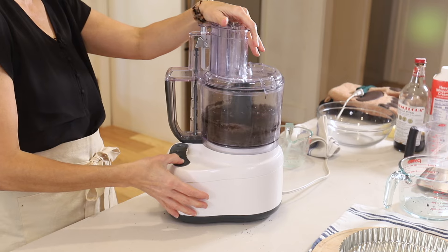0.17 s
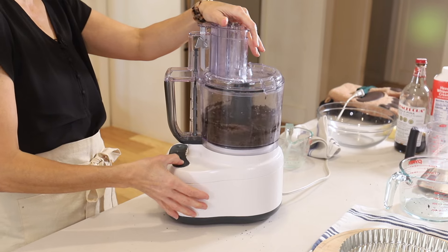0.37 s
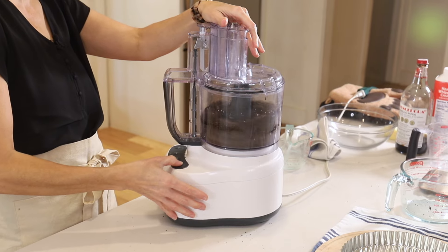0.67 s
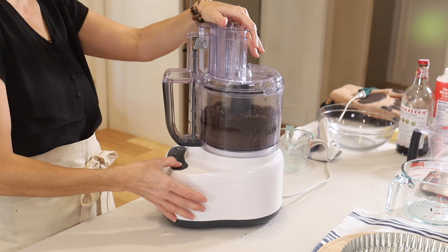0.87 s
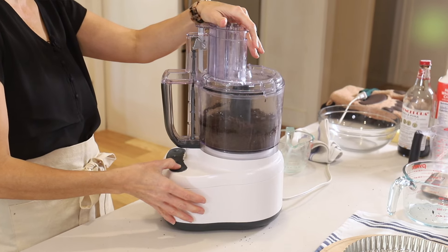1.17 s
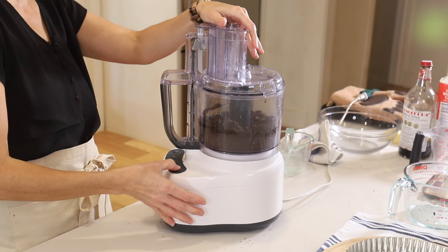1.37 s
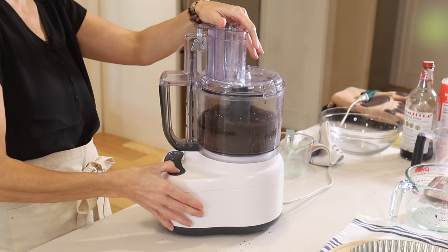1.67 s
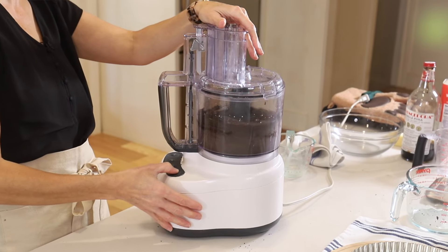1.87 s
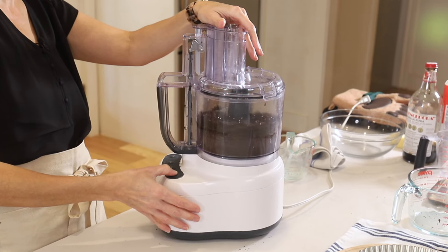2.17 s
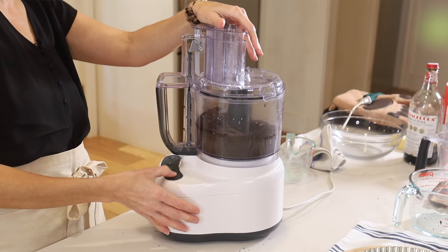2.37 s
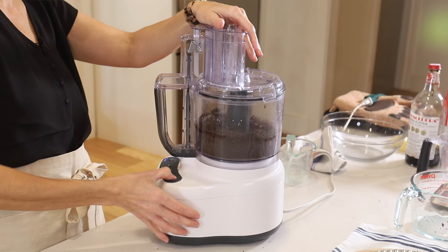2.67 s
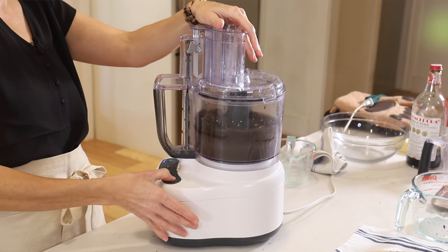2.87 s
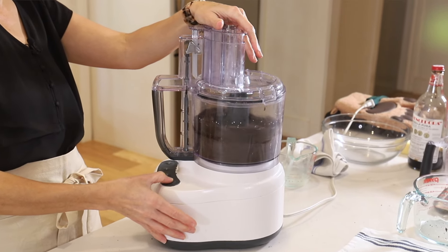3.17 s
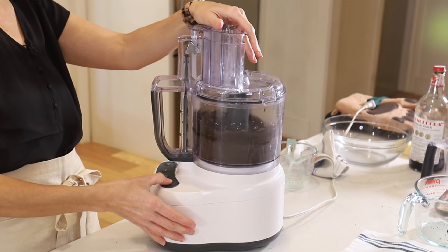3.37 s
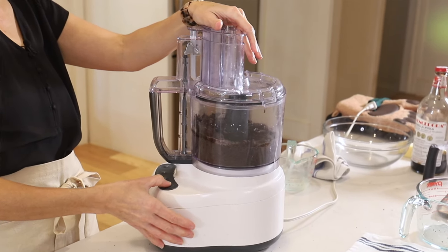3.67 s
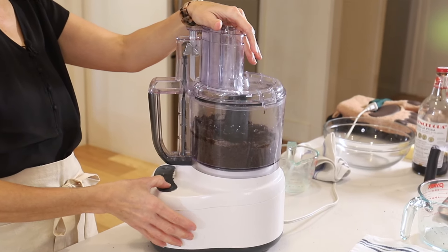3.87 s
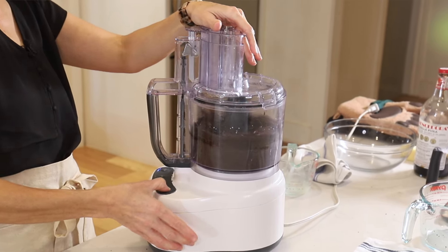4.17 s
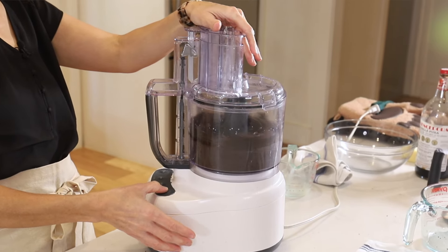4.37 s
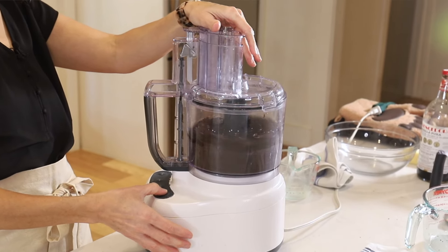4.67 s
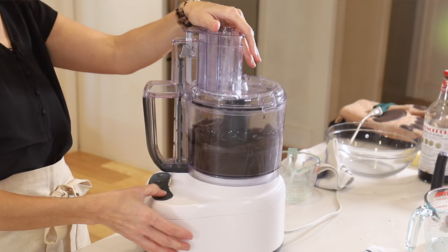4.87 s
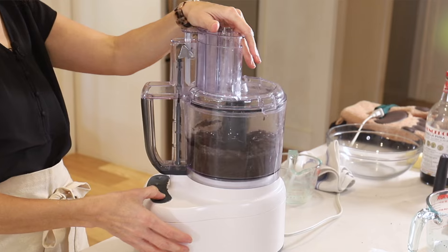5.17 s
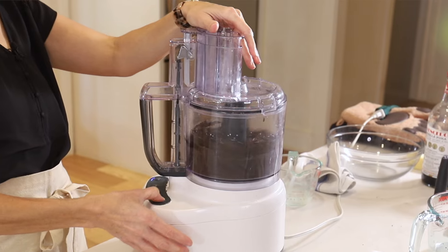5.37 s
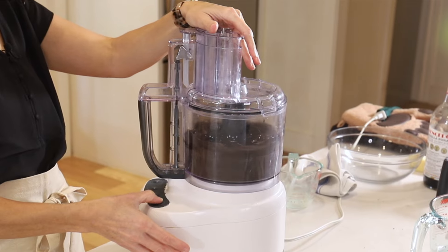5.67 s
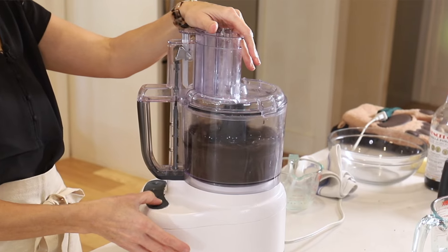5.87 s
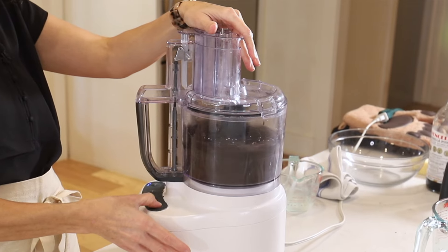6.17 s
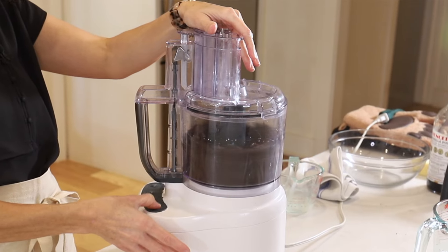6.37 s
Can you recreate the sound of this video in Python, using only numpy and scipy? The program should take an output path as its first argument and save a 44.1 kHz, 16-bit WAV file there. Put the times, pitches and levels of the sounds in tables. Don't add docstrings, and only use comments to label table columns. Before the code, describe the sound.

A food processor is pulsed in short bursts, its geared motor whining up and sagging down while the blade grinds dry crumbs in a kitchen.

```python
import sys
import numpy as np
from scipy import signal
from scipy.fft import rfft, irfft, next_fast_len
from scipy.io import wavfile
from scipy.ndimage import uniform_filter1d

SR = 44100
rng = np.random.default_rng(int(sys.argv[2]) if len(sys.argv) > 2 else 0)


def to_linear_factor(level_db):
    exponent = np.asarray(level_db, float) / 20
    return 10 ** exponent


def transcribe(signal):
    frames = np.atleast_2d(signal).T
    limited = np.clip(frames, -1, 1)
    pcm = np.round(limited * 32767).astype(np.int16)
    wavfile.write(sys.argv[1], SR, pcm)


N = 288017

# (power on [s], power off [s], drag of the heap [x],
# bite as the blade catches [dB], how early the noise dies [x])
PRESSES = [
    (-.5, -0.28, 1.17, -60, 0.87),
    (0.449, 0.641, 1, -21, 1.18),
    (1.572, 1.821, 1.03, -21.5, 0.96),
    (2.6909, 2.945, 1.02, -19, 1.03),
    (4.014, 4.29, 1.02, -26, 0.84),
    (5.341, 5.584, 1.018, -23.5, 1.05),
    (6.032, 6.229, 0.99, -24, 1.5),
    (6.407, 6.899, 1.002, -39, 1.06),
]
# (time [s], peak level [dB])
SWITCH_SNAPS = [(.434, -45.5), (.444, -39), (1.559, -45), (1.568, -37.5), (2.676, -43), (2.684, -37.5),
                (3.988, -49.5), (4.0, -46), (4.008, -33.5), (5.326, -43), (5.341, -39)]
# (time [s], peak level [dB])
BASE_KICKS = [
    (0.457, -39),
    (1.572, -44.5),
    (2.694, -41),
    (4.022, -41.5),
    (5.351, -43),
    (6.03, -50),
]
TORQUE_FADE_HZ = 1310
IDLER_TEETH = 45


def rms_one(x):
    return x / np.sqrt(np.mean(x ** 2) + 1e-20)


def at_hz(points, hz):
    points = np.array(points)
    return np.interp(np.log(hz + 1), np.log(points[:, 0]), points[:, 1])


def bumps(modes, hz):
    return sum(db / (1 + ((hz - centre) / width * 2) ** 2) for centre, width, db in modes)


def drift(rate_hz):
    r = np.exp(-2 * np.pi * rate_hz / SR)
    slow = signal.lfilter([1], [1, -2 * r, r * r], rng.standard_normal(N + SR))
    return rms_one(slow[SR:])


def colour(x, gain_db):
    size = next_fast_len(N + SR // 2, real=True) // 2 * 2
    hz = np.arange(size // 2 + 1) * SR / size
    cepstrum = irfft(gain_db(hz) * np.log(10) / 20, size)
    cepstrum[1:size // 2] *= 2
    cepstrum[size // 2 + 1:] = 0
    return irfft(rfft(x, size) * np.exp(rfft(cepstrum)), size)[..., :N]


def band(x, low_hz, high_hz):
    sos = signal.butter(4, [low_hz, high_hz], "band", fs=SR, output="sos")
    return rms_one(signal.sosfilt(sos, x))


def ring(clicks, hz, t60):
    r, w = to_linear_factor(-60 / (t60 * SR)), 2 * np.pi * hz / SR
    return signal.lfilter([0, np.sin(w)], [1, -2 * r * np.cos(w), r * r], clicks + 1e-18)


def fade(x, t60):
    return signal.lfilter([1], [1, -to_linear_factor(-60 / (t60 * SR))], x)


def strikes(table):
    clicks = np.zeros(N)
    clicks[[round(s * SR) for s, db in table]] = to_linear_factor(np.array(table)[:, 1])
    return clicks


def swell(rows, lag_s, width_s):
    now, out = np.arange(N) / SR, np.zeros(N)
    for s, db in rows:
        near = slice(int(s * SR) - 2000, int(s * SR) + 4000)
        out[near] += to_linear_factor(db) * np.exp(-.5 * ((now[near] - s - lag_s) / width_s) ** 2)
    return out


def housing_db(hz):
    # (frequency [Hz], level [dB])
    broad = [(40, -48), (96, -34), (184, -25.5), (311, -19), (512, -10.5), (1140, -12), (1500, 0),
             (1830, -5.5), (2470, -9), (3020, -6.5), (6560, -23.5), (8800, -30), (10000, -32),
             (15700, -38.5)]
    # (frequency [Hz], width [Hz], level above the broad colour [dB])
    panels = [(176.6, 56, 7.5), (386, 140, 2), (529.3, 68, 7), (674.6, 24, 6.5), (850, 22, 7),
              (976, 68, 5.5), (1230, 36, -1.5), (1420, 64, 0), (1547, 39, 3.5), (1720, 38, 5.5),
              (1953, 42, 7.5), (2178, 184, 14), (2470, 95, 3), (2516, 18, 1.5), (2724, 46, 7),
              (3012, 136, 4.5), (3936, 37, 5), (4550, 370, 1.5), (5330, 170, 1.5), (6200, 150, 4.5),
              (8500, 300, 1.5), (6960, 170, 6), (7880, 170, 5.5)]
    return at_hz(broad, hz) + bumps(panels, hz)


def room_tone():
    # (frequency [Hz], level [dB])
    spectrum = [(20, -31), (45, -32), (62, 5.5), (85, -4), (158, 6), (443, 2.5), (692, 4.5), (1080, -5),
                (1790, -3), (4740, -17.5), (15700, -26), (17000, -25)]
    noise = colour(rng.standard_normal(N), lambda hz: at_hz(spectrum, hz))
    return to_linear_factor(-44.5 - 14.0) * rms_one(noise)


def motor():
    start_hz, stall_hz_per_s = 954.4, 71790
    rub_hz_per_s, drag_hz_per_s, drag_power = 1028, 2278, .571
    release_s = .04
    on, off, drag = np.transpose(PRESSES)[:3, :, None]
    t = np.arange(N * 1000 // SR + 2) / 1000
    rise = np.clip((t - on) * 1000, 0, 1)
    fall = np.clip((off - t) / release_s + .5, 0, 1)
    power = np.sum(rise * fall, axis=0)
    heap = drag[np.searchsorted(on[:, 0], t) - 1, 0]
    speed = [float(start_hz)]
    for pull, load in zip(power * stall_hz_per_s, heap):
        hz = speed[-1]
        resistance = load * (rub_hz_per_s + drag_hz_per_s * (hz / 1000) ** drag_power)
        push = pull * np.exp(-hz / TORQUE_FADE_HZ) - resistance
        speed.append(max(hz + push / 1000, 1.))
    now = np.arange(N) / SR
    press = np.searchsorted(on[:, 0], now) - 1
    return np.interp(now, t, speed[:-1]), np.interp(now, t, power), press


def effort(mesh_hz, power, press, law, settle, creak_db):
    db, slope_db, knee_hz, steep, pull_db = law
    settle_db, settle_t60 = settle
    pull = power * np.exp(-mesh_hz / TORQUE_FADE_HZ)
    knee = knee_hz * np.array(PRESSES)[press, 4]
    running = to_linear_factor(db + slope_db * np.log2(mesh_hz / 2000) + pull_db * pull)
    running = running / np.sqrt(1 + (knee / mesh_hz) ** steep)
    trail = fade(running, settle_t60) * np.log(1000) / (settle_t60 * SR)
    return running + to_linear_factor(settle_db) * trail + to_linear_factor(creak_db) * fade(strikes(SWITCH_SNAPS), 0.12)


def grinding(mesh_hz, per_s, spread_db, runout_db, rattle_db, swish_db, surge_db):
    mesh_per_blade_turn = 135
    sizes = to_linear_factor(spread_db * np.minimum(rng.exponential(1, N), 3.5)) * rng.choice([-1, 1], N)
    crumbs = sizes * (rng.random(N) < per_s * to_linear_factor(3.0 * drift(30)) / SR)
    angle = 2 * np.pi * np.cumsum(mesh_hz) / SR
    blade = np.cos(angle / mesh_per_blade_turn) + 0.49 * np.cos(2 * angle / mesh_per_blade_turn)
    bearing = rng.standard_normal(N) * to_linear_factor(runout_db * np.cos(angle / IDLER_TEETH))
    bearing = bearing * to_linear_factor(rattle_db * np.cos(2 * angle / IDLER_TEETH))
    drive = rms_one(crumbs) * to_linear_factor(-3) + bearing
    drive = drive * to_linear_factor(swish_db * blade + surge_db * drift(25))
    return colour(drive, housing_db)


def fluttering(noise, flutter_db):
    edges_hz = (1150, 1600, 1870, 2080, 2400, 2850, 4000)
    steady = band(noise, edges_hz[0], edges_hz[-1])
    out = steady
    for pair in zip(edges_hz, edges_hz[1:]):
        part = signal.sosfilt(signal.butter(2, pair, "band", fs=SR, output="sos"), steady)
        out = out + (to_linear_factor(flutter_db * drift(17)) - 1) * part
    return rms_one(out)


def lid_at_rest(x, mesh_hz):
    lid_hz, width_hz, wakes_hz, share_lost_at_rest = 2180, 140, 300, .5
    ringing = signal.lfilter(*signal.iirpeak(lid_hz, lid_hz / width_hz, fs=SR), x)
    return x - share_lost_at_rest / (1 + (mesh_hz / wakes_hz) ** 2) * ringing


def gears(orders, mesh_hz, wobble_db, runout_db, slack):
    # (frequency [Hz], width [Hz], level [dB])
    mounts = [(193, 35, 10), (511, 80, 12.5), (667, 71, 8), (870, 490, 8), (1760, 97, 7.5),
              (3200, 910, 7.5), (5600, 1500, -2), (7730, 650, 16), (8602, 250, 9)]
    turns, speed = np.cumsum(mesh_hz) / SR, mesh_hz / 1500 + 0.31
    flicker = [speed * drift(rate) for rate in (50, 70, 90)]
    play = drift(70) + speed ** 2 * drift(150)
    tones = np.zeros(N)
    for i, (multiple, db, slope_db) in enumerate(orders):
        level = to_linear_factor(db + slope_db * np.log2(speed) + wobble_db * flicker[i % 3])
        tones += level * np.sin(2 * np.pi * multiple * (turns + slack * play) + i)
    tones = tones * to_linear_factor(runout_db * np.cos(2 * np.pi * turns / IDLER_TEETH))
    return rms_one(colour(tones, lambda hz: housing_db(hz) + bumps(mounts, hz)))


def tone_db(mesh_hz, power, press, column):
    # (mesh rate [Hz], whine [dB], tooth-knock overtones [dB])
    driven_levels = [(500, -35, -54), (970, -29.5, -41), (1610, -33.5, -30), (1970, -37.5, -45),
                     (2500, -44, -44), (2860, -38, -26)]
    # (mesh rate [Hz], whine [dB], tooth-knock overtones [dB])
    coasting_levels = [(60, -33, -41), (196, -44, -40), (390, -35, -33.5), (650, -32.5, -32),
                       (1010, -28.5, -35.5), (1410, -35.5, -54), (1900, -35.5, -49), (2610, -37, -32.5)]
    # (driven whine [dB], driven knock [dB], coasting whine [dB], coasting knock [dB])
    contact_levels = [
        (.1, .1, .8, .8),
        (1.5, -.5, 1.2, 1.5),
        (-2, .1, .3, -.5),
        (.3, .1, -.8, -.3),
        (-.8, .5, -1.2, -1.2),
        (3, -2.5, -2.5, -2.5),
        (3.5, -.5, -.5, .1),
        (1.2, .5, .1, .1),
    ]
    backlash_s = 0.024
    driven = uniform_filter1d(power, size=int(backlash_s * SR))
    contact = np.array(contact_levels)[press]
    on = at_hz(np.array(driven_levels)[:, [0, column]], mesh_hz) + contact[:, column - 1]
    off = at_hz(np.array(coasting_levels)[:, [0, column]], mesh_hz) + contact[:, column + 1]
    patchy = .8 * drift(9)
    return patchy + driven * on + (1 - driven) * off


def gear_whine(mesh_hz, power, press):
    # (multiple of mesh rate, level [dB], slope [dB per octave of speed])
    orders = [(.0909, 5.5, 0.4), (.1818, -10.5, -6), (.335, -8.5, 8), (1.0, 5, 2)]
    level = to_linear_factor(tone_db(mesh_hz, power, press, column=1))
    return level * gears(orders, mesh_hz, wobble_db=2.2, runout_db=3.5, slack=.04)


def tooth_knock(mesh_hz, power, press):
    # (multiple of mesh rate, level [dB], slope [dB per octave of speed])
    overtones = [(2.0, 5, -2), (3.0, 2.5, -1), (4.0, -3, -6), (5.0, -10.5, -12), (6.0, -20.5, -9),
                 (7.0, -1, -2)]
    level = to_linear_factor(tone_db(mesh_hz, power, press, column=2))
    return level * gears(overtones, mesh_hz, wobble_db=1.5, runout_db=2.5, slack=.011)


def switch_clicks():
    clicks = strikes(SWITCH_SNAPS)
    snap = clicks + 0.36 * rng.standard_normal(N) * fade(clicks, 0.031)
    modes = [(590, 495, 22), (3850, 640, 5.1)]   # (frequency [Hz], width [Hz], level [dB])
    return to_linear_factor(18) * colour(snap, lambda hz: 0.82 * housing_db(hz) + bumps(modes, hz))


def crumb_knocks():
    # (time [s], peak level [dB])
    hits = [(0.449, -29), (0.5175, -33), (0.6195, -26), (0.967, -39), (1.6164, -32), (1.645, -23),
            (1.9441, -28), (2.7529, -38), (3.244, -39), (4.9242, -33), (5.9543, -22), (6.0372, -30),
            (6.112, -38)]
    return to_linear_factor(-12.5) * band(rng.standard_normal(N), 3500, 14000) * fade(strikes(hits), 0.017)


def base_jolts():
    # (frequency [Hz], level [dB], decay time T60 [s])
    modes = [(115, -34, 0.051), (182, -3.5, 0.085), (281, 2, 0.075), (388, 11, 0.097), (546, -36, 0.027),
             (846, 12.5, 0.011)]
    soft_blow = signal.lfilter(np.hanning(24) / 12, [1], strikes(BASE_KICKS))
    return to_linear_factor(3.5) * sum(to_linear_factor(db) * ring(soft_blow, hz, t60) for hz, db, t60 in modes)


def machine_sound():
    mesh_hz, power, press = motor()
    bite = swell(np.array(PRESSES)[1:, [0, 3]], lag_s=0.02, width_s=0.0046)
    lurch = to_linear_factor(3.5) * swell(BASE_KICKS, lag_s=0.012, width_s=0.005)
    # (level under the running noise [dB], decay time T60 [s])
    grind_law = (-25.5, 0.84, 511, 3.5, 7.5)
    grind = effort(mesh_hz, power, press, grind_law, settle=(-13.5, 0.67), creak_db=0)
    rumble = effort(mesh_hz, power, press, law=(-34, -0.25, 343, 4.5, 6), settle=(-12.5, 0.85), creak_db=-5.5)
    rumble = rumble + lurch + to_linear_factor(-22) * bite
    hiss = effort(mesh_hz, power, press, law=(-38.5, 1.5, 750, 3.5, 8.5), settle=(-26, 0.76), creak_db=-28)
    hiss = hiss + to_linear_factor(-37.5) * bite

    noise = grinding(mesh_hz, per_s=3000, spread_db=4.0, runout_db=-0.7, rattle_db=1.1, swish_db=0.48, surge_db=1.32)
    bowl = lid_at_rest(fluttering(noise, flutter_db=2.0), mesh_hz)
    machine = to_linear_factor(-3.5) * (grind + bite) * bowl
    machine += rumble * to_linear_factor(-4.5 + 1.04 * drift(16.5)) * band(noise, 31, 1040)
    machine += hiss * to_linear_factor(-3.0) * band(noise, 4024, 8670)
    machine += hiss ** 0.61 * to_linear_factor(-29.5) * band(noise, 9630, 21800)
    machine += to_linear_factor(-10) * bite * band(noise, 2420, 4130)
    load = grind / to_linear_factor(grind_law[0])
    machine += load * gear_whine(mesh_hz, power, press)
    machine += load * tooth_knock(mesh_hz, power, press)
    machine += switch_clicks() + crumb_knocks() + base_jolts()
    return signal.sosfilt(signal.butter(4, 94, "high", fs=SR, output="sos"), machine)


def kitchen(x):
    # (frequency [Hz], T60 [s])
    decay = [(100, 0.77), (1000, 0.47), (4000, 0.36), (16000, 0.74)]
    size = next_fast_len(N + SR)
    hz = np.arange(size // 2 + 1) * SR / size
    response = 0
    for i, lag_s in enumerate(rng.uniform(.012, .04, 10)):
        loop = to_linear_factor(-60 * lag_s / at_hz(decay, hz)) * np.exp(-2j * np.pi * hz * lag_s)
        response = response + (-1) ** i * loop / (1 - loop)
    return irfft(rfft(x, size) * response, size)[:N]


def scene():
    machine = machine_sound()
    mono = machine + to_linear_factor(-23.0) * kitchen(machine) + room_tone()
    return np.array([mono, mono])


def roll_off(x):
    return signal.sosfilt(signal.butter(12, 15890, fs=SR, output="sos"), x)


def record(dry):
    rounded = .36 * np.tanh(dry / .36)
    mix = signal.sosfilt(signal.ellip(12, .2, 70, 15690, fs=SR, output="sos"), rounded)
    return roll_off(mix)


dry = scene()
out = record(dry)
transcribe(out)
```